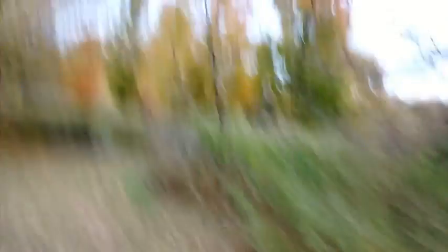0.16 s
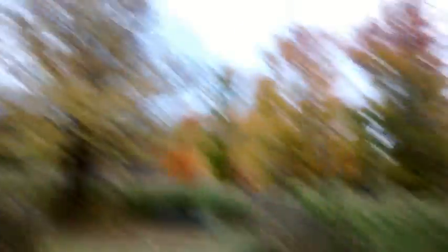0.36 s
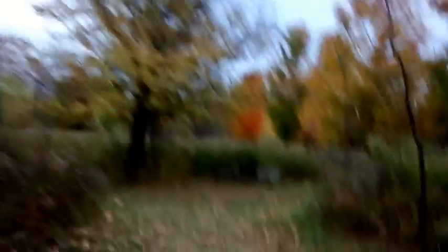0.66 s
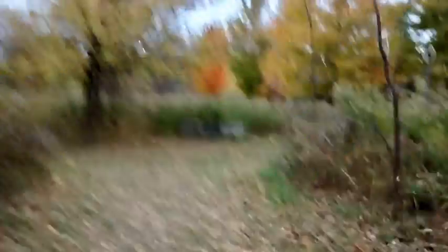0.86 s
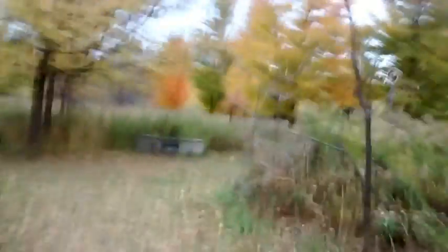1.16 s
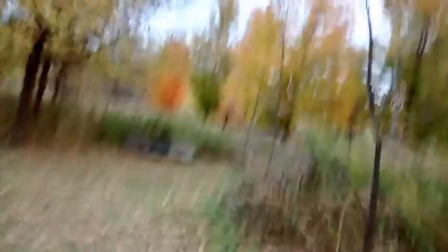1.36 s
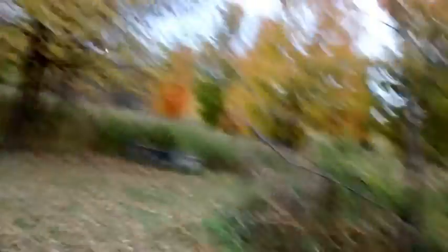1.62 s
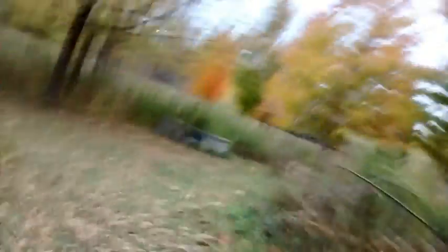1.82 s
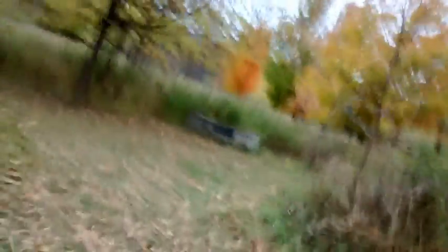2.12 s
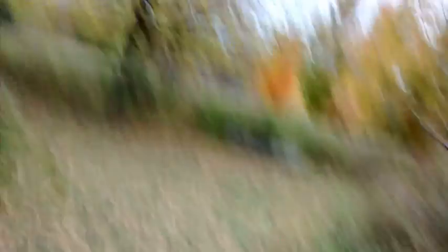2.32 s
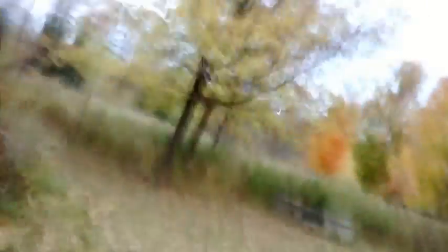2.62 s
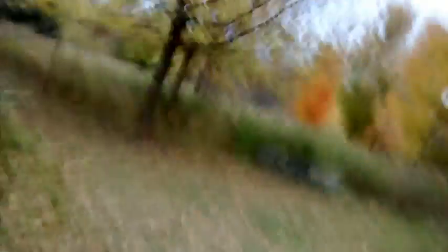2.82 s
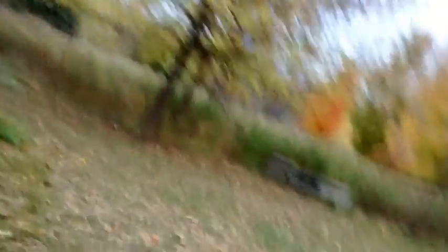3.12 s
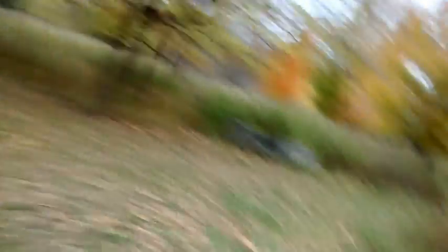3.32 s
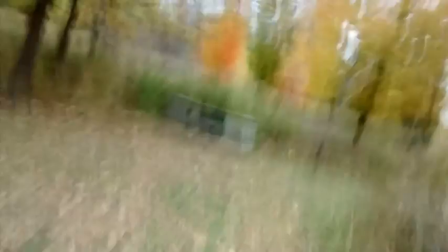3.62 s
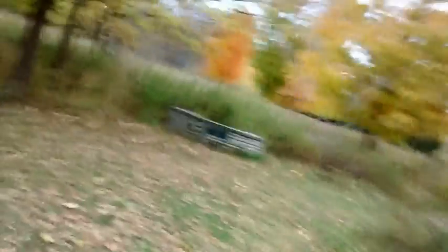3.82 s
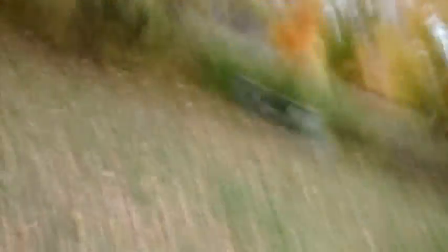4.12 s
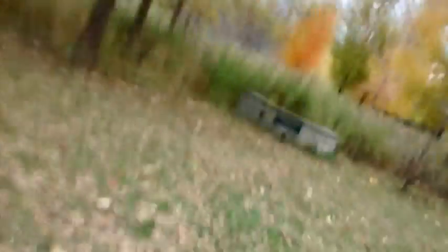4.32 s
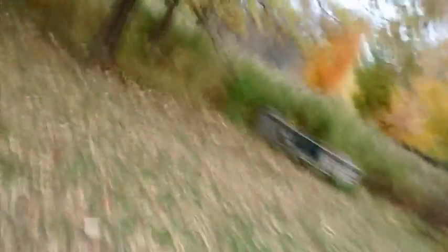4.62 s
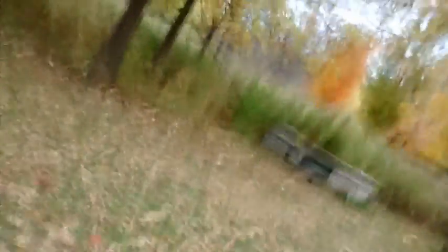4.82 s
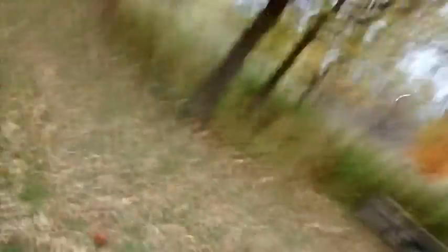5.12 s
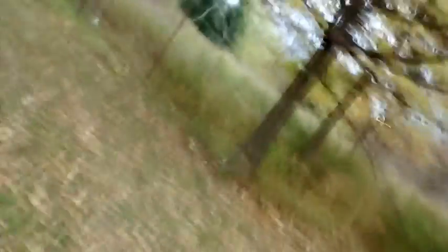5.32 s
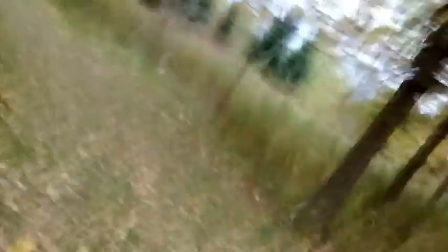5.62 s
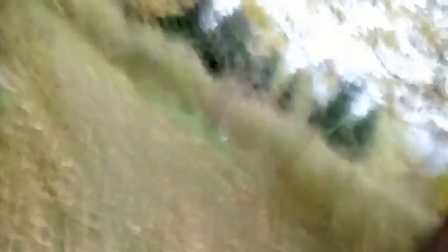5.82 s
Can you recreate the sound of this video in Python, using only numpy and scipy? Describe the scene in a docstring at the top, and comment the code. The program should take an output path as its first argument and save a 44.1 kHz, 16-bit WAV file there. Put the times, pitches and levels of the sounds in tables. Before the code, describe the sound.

A bicycle rolls along a grassy, leaf-strewn trail, heard close from a small shaky camera carried by the rider. Soft rolling rush and faint freewheel ticks come first; then leaf rustle thickens into crisp crunches and sharp stalk snaps, densest and loudest in the last second and a half. Low wind puffs and jolts bump the microphone in open air, with no echo.

```python
"""A bicycle rolls over grass and dry leaves, heard close from a small camera carried by the rider.
The tyres swish and crush leaves in bursts that grow as the litter thickens: showers of tiny noise pulses.
Dry stalks snap close by as ringing clicks, gritty scuffs bite the soil and the freewheel ticks early on.
Under it lie filtered noise for rolling, foliage and wind on the two microphone ports, and low jolts."""
import sys
import numpy as np
from scipy import signal
from scipy.fft import rfft, irfft
from scipy.io import wavfile
from scipy.ndimage import uniform_filter1d

SR = 44100
rng = np.random.default_rng(int(sys.argv[2]) if len(sys.argv) > 2 else 0)


def to_wav(s):
    """Save 16-bit WAV."""
    ch = np.atleast_2d(s).T  # columns
    pcm = np.round(np.clip(ch, -1, 1) * 32767)  # PCM
    wavfile.write(sys.argv[1], SR, pcm.astype(np.int16))


N = 262836
T = np.arange(N) / SR  # seconds
FREQ = np.arange(N // 2 + 1) * SR / N  # Hz

# The pace of the ride. Each row: time in seconds, relative wind level in dB, relative rolling level in dB.
RIDE = [(0, -58, -47), (.55, -53.5, -47), (.72, -55, -49.5), (1.2, -55.5, -49.5), (1.65, -54, -47.5),
        (2.7, -51.5, -47.5), (3.3, -56, -48), (3.9, -53, -47), (4.4, -55, -48), (4.9, -56, -47.5),
        (5.5, -54, -46.5), (5.78, -48.5, -47), (5.96, -55, -47.5)]
# How the rustle leans between the ports. Each row: frequency in Hz, left minus right in dB.
LEAF_SIDE = [(1500, -2.5), (2500, -4), (3600, -1), (5500, 2.5), (7500, 3), (11000, 3), (15000, 3)]
# How the rolling leans between the ports. Each row: frequency in Hz, left minus right in dB.
ROLL_SIDE = [(150, 1), (400, -6.5), (800, -4.5), (1200, -1), (2000, -3)]


def undb(db):
    """Decibels to gain."""
    return 10 ** (np.asarray(db) / 20)


def unit(x):
    """Scale to rms 1."""
    return x / np.sqrt(np.mean(x ** 2))


def curve(rows, axis=1):
    """One column of a time table at every sample."""
    rows = np.array(rows)
    return np.interp(T, rows[:, 0], rows[:, axis])


def swells(rows):
    """Bell-shaped swells from rows of centre in seconds, level in dB, standard deviation in seconds."""
    return sum(undb(db) * np.exp(-.5 * ((T - s) / length) ** 2) for s, db, length in rows)


def shape(points):
    """A (Hz, value) table at every frequency, interpolated over log frequency."""
    hz, value = np.transpose(points)
    return np.interp(np.log(FREQ + 1), np.log(hz), value)


def colour(x, points):
    """Filter by a (Hz, dB) table."""
    return irfft(rfft(x) * undb(shape(points)), N)


def walk(rate):
    """Smooth chance with an rms of 1: random steps, `rate` per second, rounded by a moving average."""
    hold = int(SR / rate)
    steps = np.repeat(rng.standard_normal(N // hold + 1), hold)
    return unit(uniform_filter1d(steps, hold)[:N])


def add(track, s, sound):
    """Mix a short sound in at time s."""
    start = max(int(s * SR), 0)
    part = track[start:start + len(sound)]
    part += sound[:len(part)]


def pan(db):
    """Left and right gains for a left-minus-right level in dB, at constant power."""
    gains = undb(np.outer([.5, -.5], db))
    return gains / np.sqrt(np.mean(gains ** 2, axis=0))


def ports(x, side, lag_s=0):
    """The two ports hear one sound with their own phase and level; its direction adds a lag in the treble."""
    # How far the left port leads. Each row: frequency in Hz, phase in radians.
    port_phase = [(250, -1.19), (700, -0.83), (1200, -0.12), (1600, 1.25), (2050, 2.87), (2700, 3.22),
                  (3500, 5.95), (4100, 6.62), (4900, 9.83), (5600, 13.62), (6300, 13.99), (7400, 16.47),
                  (11000, 21.97), (15000, 27.53)]
    body_hz = 2530  # above this the camera is in the way of the waves, so their phase depends on direction
    phase = np.interp(FREQ, *np.transpose(port_phase))
    phase = phase + 2 * np.pi * np.maximum(FREQ - body_hz, 0) * lag_s
    lean = undb(shape(side) / 2)
    return irfft(rfft(x) * np.array([lean, np.exp(-1j * phase) / lean]), N)


def foliage():
    """A faint, even hiss from the trees and tall grass: noise mostly independent at the two ports."""
    # Tone of stirring leaves all around. Each row: frequency in Hz, relative gain in dB.
    hiss_tone = [(800, -5), (1600, 5.5), (2050, 13), (2550, -8.5), (3100, 14.5), (4200, 10.5), (6000, 8),
                 (7500, 7.5), (10000, -7), (15000, 1.5)]
    around = rng.standard_normal((2, N))
    common = ports(rng.standard_normal(N), ROLL_SIDE)
    return undb(-57.0) * unit(colour(around + 0.27 * common, hiss_tone))


def eddies(opposed):
    """Turbulence at the two ports: noise of their own plus a share that pushes them in opposite senses."""
    return rng.standard_normal((2, N)) + opposed * np.outer([1, -1], rng.standard_normal(N))


def wind():
    """A breeze presses on each port nearly independently; gusts buffet them mostly in opposite senses."""
    # Tone of the breeze on the ports. Each row: frequency in Hz, relative gain in dB.
    breeze_tone = [(15, -17), (30, -23), (62, 2.5), (90, -2.5), (130, -2.5), (200, -9), (350, -26.5),
                   (1000, -54)]
    # Tone of the buffeting. Each row: frequency in Hz, relative gain in dB.
    buffet_tone = [(15, 4), (40, 15), (80, 11.5), (140, -10), (250, -16), (500, -28), (1500, -35)]
    # Gusts on the ports. Each row: centre in seconds, level in dB, standard deviation in seconds.
    gusts = [(2.57, -48, .07), (2.739, -40, 0.04), (2.961, -39, 0.027), (3.281, -48, 0.041),
             (3.82, -40, .025), (4.35, -37, 0.11), (5.523, -35, 0.034), (5.63, -40.5, 0.022),
             (5.773, -32, 0.043), (5.92, -36, 0.048)]
    breeze_level_db = curve(RIDE) + 3.5 + 0.47 * walk(17)
    breeze = unit(colour(eddies(0.19), breeze_tone)) * undb(breeze_level_db)
    buffet = unit(colour(eddies(3.2), buffet_tone))
    return breeze + swells(gusts) * buffet


def jolts():
    """A jerk of the camera shoves air into one port and out of the other for about one cycle."""
    # Low thumps. Each row: centre in seconds, relative level in dB, frequency in Hz.
    thumps = [(4.29, -23, 42.04), (4.356, -20.5, 79.83), (5.528, -31, 85.76), (5.725, -26.5, 130.4),
              (5.747, -19, 89.9), (5.772, -24.5, 150.4), (5.8, -13.5, 176), (5.95, -26, 65.4)]
    push = np.zeros(N)
    for s, db, hz in thumps:
        cycles = hz * (T - s)
        push += undb(db) * np.sin(2 * np.pi * cycles) * np.exp(-(2.8 * cycles) ** 2)
    return np.outer([-.55, 1], push)


def rolling():
    """The soft rush of tyres on turf and of passing air: shared noise plus noise of each port's own."""
    # Tone of the rush. Each row: frequency in Hz, relative gain in dB.
    rush_tone = [(100, 4), (200, -2.5), (300, -1.5), (450, 0.5), (850, -3.5), (1080, -9), (1400, -14.5),
                 (1950, -13), (2500, -26.5), (3000, -45), (8000, -31)]
    rush = ports(rng.standard_normal(N), ROLL_SIDE)
    lean = undb(np.outer([1, -1], shape(ROLL_SIDE)) / 2)
    diffuse = irfft(rfft(rng.standard_normal((2, N))) * lean, N)
    level_db = curve(RIDE, axis=2) + 3.5 + .5 * walk(9)
    return unit(colour(rush + 0.74 * diffuse, rush_tone)) * undb(level_db)


def hub_ring(age):
    """The hub's answer to one tap: a sum of decaying modes."""
    # Modes of the hub. Each row: frequency in Hz, relative level in dB, 60 dB decay in seconds.
    modes = [(2360, -5, 0.028), (2500, -11, 0.021), (6010, -9, 0.016), (6190, -2, 0.019), (6640, 2, 0.009)]
    ring = np.zeros(len(age))
    for hz, db, t60 in modes:
        ring += undb(db) * np.sin(2 * np.pi * hz * age) * np.exp(-np.log(1000) * age / t60)
    return ring


def freewheel():
    """The pawl drops over a tooth and rattles the hub: a short scrape of noise excites the hub modes."""
    # Drops of the pawl. Each row: start in seconds, relative level in dB.
    drops = [(0.269, -46), (0.312, -44.5), (0.349, -38.5), (0.388, -39.5), (0.440, -43), (0.503, -39.5),
             (0.561, -42.5), (0.737, -47), (0.774, -45), (0.85, -44), (0.983, -46), (1.046, -44.5)]
    age = T[:2048]
    track = np.zeros(N)
    for s, db in drops:
        contact = rng.standard_normal(len(age)) * age * np.exp(-age / 0.0027)
        ring = signal.fftconvolve(contact, hub_ring(age))[:len(age)]
        tick = ring / np.abs(ring).max() + 0.59 * contact / np.abs(contact).max()
        add(track, s, undb(db) * tick)
    return undb(3.5) * ports(track, [(2000, -10.5), (6000, -0.5)])


def snaps():
    """A stalk breaks with one clean click, rings for a few cycles and sheds faint splinters."""
    # Stalks and leaf ribs, some breaking twice. Each row: start in seconds, relative strength in dB,
    # ring frequency in Hz, ring decay to 1/e in seconds, left minus right in dB before the ports' own lean.
    breaks = [(1.3268, -8, 6900, 0.0005, 8), (1.5122, -14.5, 6100, 0.00024, 6),
              (1.853, -10.5, 6900, 0.00022, -4), (1.8578, -7.5, 3960, 0.00013, 5),
              (2.043, -10, 7840, 0.00029, -1), (2.2104, -6.5, 6440, 0.00013, 3),
              (2.2151, -12.5, 6460, 0.00021, 8), (2.431, -13.0, 6240, 0.00046, 3),
              (2.4342, -7.5, 4690, 0.00027, 15), (2.5027, -5.5, 6640, 0.00014, 6),
              (2.507, -11, 6160, 0.00011, 9), (2.5814, -4.5, 5130, 0.00012, 5),
              (2.7222, -3.5, 6630, 0.00013, 6), (2.7281, -13, 5380, 0.00028, -2.5),
              (2.7615, -15.5, 4910, 0.00029, 4.5), (2.8753, -9.5, 8100, 0.00021, 5),
              (2.9836, -7.5, 6290, 0.00014, 4), (3.088, -8.5, 4970, 0.00014, 5),
              (3.2266, -8, 5740, 0.00019, 4), (3.2333, -8.0, 5980, 0.00021, -1),
              (3.2459, -4, 5890, 0.00031, 1), (3.2652, -14, 6350, 0.00016, 5),
              (3.2951, -19, 6460, 0.00013, 1), (3.4023, -12.0, 5430, 0.00016, 7),
              (3.568, -10, 6200, 0.00012, 1.5), (3.7558, -12.5, 6340, 0.00018, 0),
              (4.0895, -13.5, 7410, 0.00022, 3), (4.0937, -8, 6350, 0.00013, 4),
              (4.124, -5, 6180, 0.00024, 0), (4.188, -5.5, 5000, 0.00014, 6),
              (4.2996, -2.5, 6400, 0.00018, 5), (4.3047, -14.0, 5006, 0.00013, 6),
              (4.4166, -4, 8400, 0.00021, 4), (4.4209, -14, 7300, 0.00011, 8),
              (4.4409, -12, 8870, 0.0001, 7), (4.5507, -13.0, 6630, 0.00014, 5),
              (4.784, -1, 7250, 0.00017, -0.5), (4.7874, -3.0, 5840, 0.00015, -3),
              (4.805, -1, 7180, 0.00027, 4), (4.8175, -8, 6960, 0.00015, 5),
              (4.8819, -14.5, 6290, 0.00015, 5), (4.9395, -9.5, 5540, 0.00028, 9),
              (5.022, -10.5, 6380, 0.0001, 0), (5.158, -11, 10080, 0.00012, 5),
              (5.2306, -8.5, 8840, 0.00035, 6), (5.2625, -8.5, 4070, 0.0002, 4),
              (5.2712, -10, 7240, 0.0002, 0), (5.339, -14.0, 6370, 0.00013, 3),
              (5.3719, -8, 3710, 0.00039, -2.5), (5.3774, -9, 3720, 0.00019, -4),
              (5.3813, -8, 4220, 0.00025, 3), (5.438, -3, 3880, 0.00033, -1),
              (5.4417, -7.5, 8880, 0.00011, 7.5), (5.4587, -7, 3700, 0.00013, 2),
              (5.4715, -6, 8210, 0.00023, 6), (5.4966, -12, 6200, 0.00013, 9),
              (5.5323, -17, 6120, 0.00015, 6), (5.5606, -10.5, 3980, 0.00029, 3),
              (5.6679, -10.5, 5340, 0.00026, 3), (5.6742, -7, 5830, 0.00028, 6),
              (5.7655, -10, 8440, 0.00016, 6), (5.802, -13.5, 8440, 0.00044, 3),
              (5.871, -6.5, 6020, 0.00027, 2), (5.9063, -14, 5590, 0.00015, 4)]
    # Tone of the breaks. Each row: frequency in Hz, relative gain in dB.
    snap_tone = [(300, -11), (1200, -5.5), (2200, 0), (3300, 1), (6300, 0.5), (7700, 0.5), (9200, 1.5),
                 (11500, -3.5), (15000, -7)]
    # How the breaks lean between the ports. Each row: frequency in Hz, left minus right in dB.
    snap_side = [(2000, 2.5), (4500, -6), (6500, 4), (10000, 5), (15000, 4)]
    age = T[:1024]
    splinter_fade = 0.14 * np.exp(-age / 0.0005) + 0.02 * np.exp(-age / 0.004)
    track = np.zeros((2, N))
    for s, db, hz, ring_s, pan_db in breaks:
        splinters = rng.standard_normal(len(age)) * splinter_fade
        crack = np.cos(2 * np.pi * hz * age) * np.exp(-age / ring_s) + splinters
        crack = crack * undb(db) / np.linalg.norm(crack)  # strength sets the energy
        for port, gain in zip(track, pan(pan_db)):
            add(port, s, gain * crack)
    return undb(-4.0) * ports(colour(track, snap_tone), snap_side, lag_s=-0.000041)


def scuffs():
    """Where a tyre bites through to the soil, a short gritty rasp gives the crunch its body."""
    # Bites into the soil. Each row: centre in seconds, relative level in dB, standard deviation in seconds.
    bites = [(.615, -52, 0.017), (1.407, -48, 0.016), (1.86, -42, 0.0075), (2.319, -48, .025),
             (2.433, -39.5, 0.0073), (2.91, -45, 0.016), (3.23, -44, 0.019), (4.092, -49, .025),
             (5.25, -47, 0.017)]
    # Tone of the dull rasp. Each row: frequency in Hz, relative gain in dB.
    rasp_tone = [(400, -21), (900, -3), (1400, -4), (2000, 7.5), (2800, -6), (5000, -25)]
    grit = rng.standard_normal(N) * (rng.random(N) < 3000 / SR)  # about 3000 grains per second
    rasp = unit(colour(ports(grit, LEAF_SIDE), rasp_tone))
    return undb(-3.0) * swells(bites) * rasp


def litter():
    """Patches swell and die under a tyre, over the turf; gives level in dB, crunch share and fizz in dB."""
    # Grass and thin litter along the way. Each row: time in seconds, relative rustle level in dB.
    turf = [(0, -51), (.16, -48.5), (.26, -59), (.46, -59), (.7, -51), (.89, -56), (1.28, -47.5),
            (1.5, -52), (2.25, -52), (2.6, -45), (3.03, -50.5), (3.3, -47), (3.6, -51), (4.0, -49),
            (4.65, -43.5), (5.3, -41), (5.6, -46.5), (5.96, -41)]
    # Patches of dry leaves. Each row: peak in seconds, relative level in dB, length scale in seconds,
    # crunch over swish in dB, fizz in dB.
    patches = [(0.101, -44.5, 0.012, -20, 2), (0.621, -41.5, 0.012, -3, -4), (1.088, -45, 0.012, -15, -1),
               (1.298, -48.5, 0.0042, -13, -5), (1.398, -44, 0.017, -19, 5), (1.753, -44, 0.031, -22, -1),
               (1.86, -33.5, 0.0085, -7, 2), (1.904, -40, 0.043, -17, 2), (2.049, -40, 0.017, -3, 3),
               (2.165, -49, 0.012, 13, -8), (2.326, -41, 0.028, -20, 1), (2.436, -39.5, 0.0059, -8, -10),
               (2.822, -47, 0.06, -11, 0), (3.19, -39.5, 0.038, -6, 0.5), (3.249, -34.5, 0.029, -22, 2.5),
               (3.412, -46.5, 0.015, -11, 0), (3.503, -48, 0.032, -13, 0), (3.665, -41, 0.027, -12, 1.5),
               (3.781, -41, 0.018, -11, -4), (3.913, -42, 0.026, -10, 2), (4.085, -36, 0.039, -11.5, -2),
               (4.156, -42.5, 0.037, -12, 2), (4.382, -36.5, 0.024, -6, 1), (4.437, -34, 0.035, -8, 2),
               (4.589, -43.5, 0.018, -12, 2), (4.658, -42.5, 0.017, -9, 5), (4.799, -31.5, .017, -4, 5),
               (4.857, -41.5, 0.016, -20, 3), (4.944, -38.5, 0.006, -23, 2), (5.016, -38.5, 0.016, -17, 4),
               (5.119, -38, 0.02, -4, -2), (5.254, -32.5, 0.026, -5, 3), (5.381, -35, 0.015, 2, 0),
               (5.464, -32.5, 0.035, 1, -1), (5.678, -33, 0.024, -7, 0), (5.734, -33, 0.024, -4.5, -1),
               (5.866, -34.5, 0.023, -2, 0), (5.917, -35.5, 0.018, -6.5, -0.5)]
    turf_crunch_db, turf_fizz_db = -9, 0.4  # crunch over swish, and fizz, between the patches
    rise, fall = .85, 1.1  # approach and release, in length scales
    edge = 1.8  # 1 = pointed, 2 = rounded
    power = undb(curve(turf)) ** 2
    crunch = power / (1 + undb(-turf_crunch_db) ** 2)
    fizz = power * turf_fizz_db
    for s, db, length, crunch_db, fizz_db in patches:
        away = np.abs(T - s) / (length * np.where(T < s, rise, fall))
        patch = undb(db) ** 2 * np.exp(-np.minimum(away, 10) ** edge)
        power = power + patch
        crunch = crunch + patch / (1 + undb(-crunch_db) ** 2)
        fizz = fizz + patch * fizz_db
    return 10 * np.log10(power), crunch / power, fizz / power


def crackles(per_s, spread_db, ring_s, scatter_s, count=12):
    """Showers of tiny fractures, in groups that each have their own short noisy ring and direction."""
    age = T[:256]
    out = 0
    for direction in np.linspace(-1, 1, count):
        breaks = np.flatnonzero(rng.random(N) < per_s / count / SR)
        chance = rng.random((N // 16, 2))[:len(breaks)]
        # a positive spread makes a few fractures loud, a negative one makes a few faint
        strength = undb(-spread_db * np.log(chance[:, 0] + 0.021))
        pulses = np.zeros(N)
        pulses[breaks] = strength * np.sign(chance[:, 1] - .5)
        ring = unit(rng.standard_normal(len(age)) * np.exp(-age / ring_s))
        group = signal.oaconvolve(pulses, ring)[:N]
        out = out + ports(group, LEAF_SIDE, direction ** 3 * scatter_s)
    return unit(out / np.sqrt(per_s))  # density alone leaves the level even


def crumples(per_s, fade_s, spread_db, steady):
    """Each leaf gives way at once and crumples on for some milliseconds; an envelope of rms 1."""
    strength = undb(2 * spread_db * np.clip(rng.standard_normal(N), -2, 2))
    starts = (rng.random(N) < per_s / SR) * strength
    power = signal.lfilter([1], [1, -np.exp(-1 / (fade_s * SR))], starts)
    return unit(np.sqrt(steady + power / power.mean()))


def shimmer(x, rate, depth_db, count=7):
    """Leaves of different sizes pass under the tyre, so neighbouring bands swell on their own."""
    centres = np.geomspace(2500, 14000, count)  # Hz
    spectrum = rfft(x)
    out = 0
    for band in np.eye(count):
        part = irfft(spectrum * np.interp(FREQ, centres, band), N)
        out = out + part * undb(depth_db * walk(rate))
    return out


def leaves():
    """Grass swishes, dry leaves crunch and add a papery fizz; thicker litter breaks more often and louder."""
    # Tone of the swish. Each row: frequency in Hz, relative gain in dB.
    swish_tone = [(500, -16), (1400, -13), (2100, -12), (2550, -3.5), (3050, -1), (4200, -2), (5000, 0.3),
                  (6000, 2.5), (7500, 0), (9000, -1.8), (10700, -3.5), (13000, -6.5), (15300, -7.5)]
    # Tone of the crunch. Each row: frequency in Hz, relative gain in dB.
    crunch_tone = [(500, -13.5), (1400, -6.5), (2100, -7), (2550, -3), (3050, 2), (3600, 6), (4200, 5),
                   (4900, 1), (6000, -16), (7500, -7), (9200, 0), (11000, -16), (15300, -18)]
    # The rustle drifts from right to left. Each row: time in seconds, left minus right in dB
    # before the ports' own lean.
    drift = [(0, -0.7), (1.4, -1), (2.8, -0.5), (4.2, 0), (5.2, 0.2), (5.96, 0.7)]
    # The papery fizz takes over between these two frequencies in Hz.
    fizz_hz = 7900, 12500
    level_db, crunch_share, fizz_db = litter()
    thickness = undb(.3 * (level_db + 42))
    blades = crackles(20000, spread_db=-2.0, ring_s=0.00091, scatter_s=0.000308)
    dry_bits = crackles(850 * thickness, spread_db=2.0, ring_s=0.00016, scatter_s=0.000236)
    crushed = crackles(1000 * thickness, spread_db=1.5, ring_s=0.00032, scatter_s=.0001)
    swish = unit(colour(dry_bits + undb(-1.0) * blades, swish_tone))
    crunch = unit(colour(crushed, crunch_tone))
    rustle = np.sqrt(1 - crunch_share) * swish + np.sqrt(crunch_share) * crunch
    fizz = irfft(rfft(rustle) * np.interp(FREQ, fizz_hz, [0, 1]), N)
    rustle = rustle + (undb(fizz_db) - 1) * fizz  # lifts or lowers the top band
    clumps = crumples(per_s=280, fade_s=0.0044, spread_db=1.5, steady=0.77)
    rustle = shimmer(rustle, rate=30, depth_db=1.77)
    return undb(level_db + 0.38) * pan(curve(drift)) * clumps * rustle


def scene():
    """All that the ride stirs up, in the open air."""
    background = foliage() + wind() + jolts()
    bicycle = rolling() + freewheel()
    ground = snaps() + scuffs() + leaves()
    return background + bicycle + ground


def record(dry):
    """The camera cuts the top with a steep low-pass."""
    top_hz = 15350
    return signal.sosfilt(signal.ellip(8, .2, 70, top_hz, fs=SR, output="sos"), dry)


dry = scene()
out = record(dry)
to_wav(out)
```